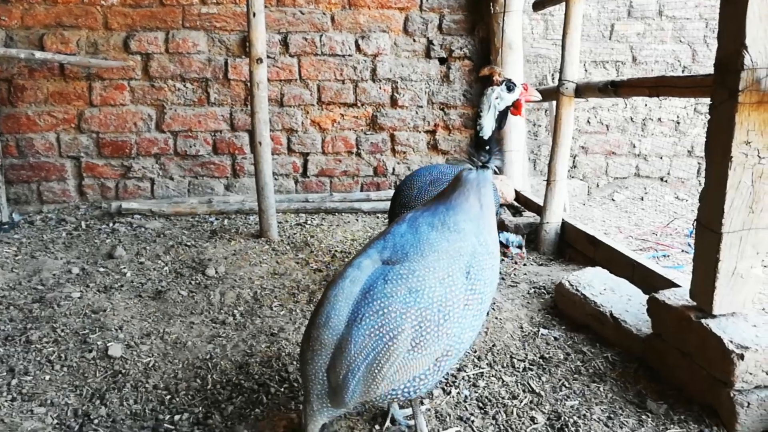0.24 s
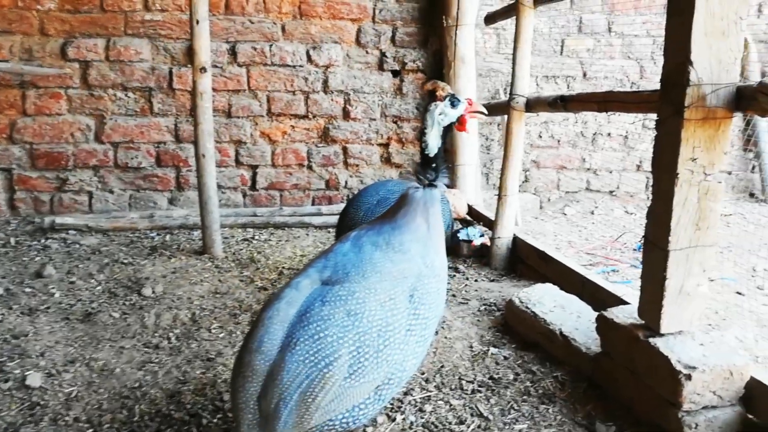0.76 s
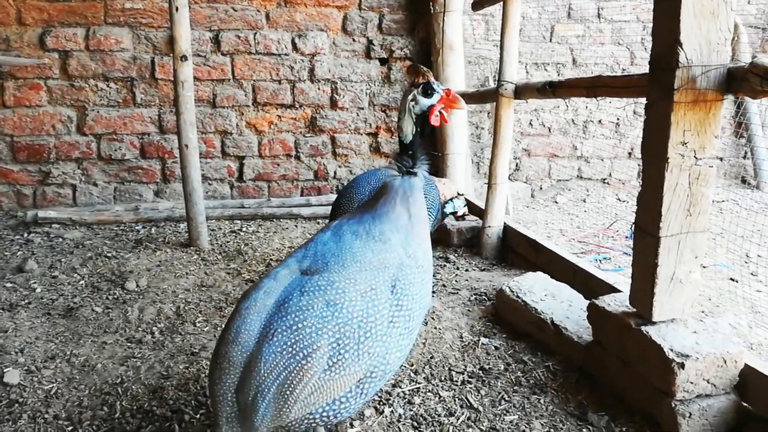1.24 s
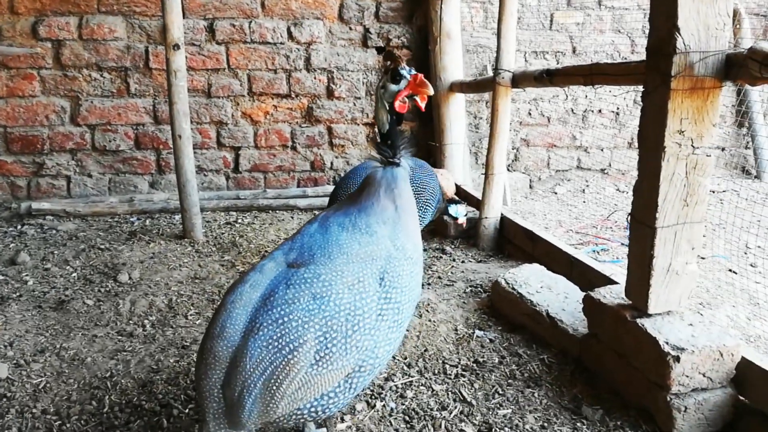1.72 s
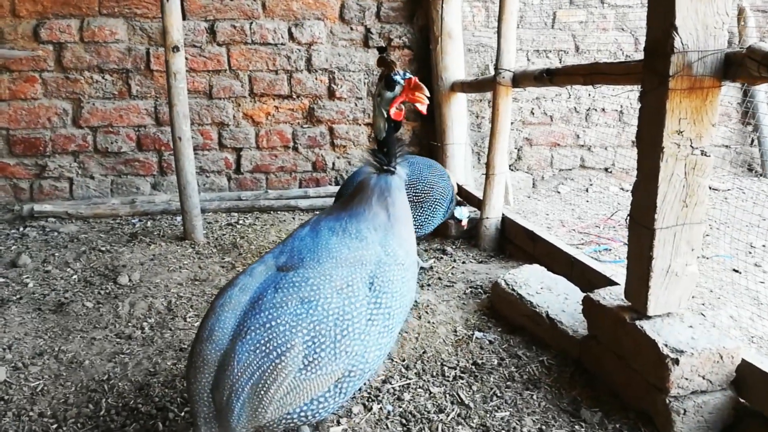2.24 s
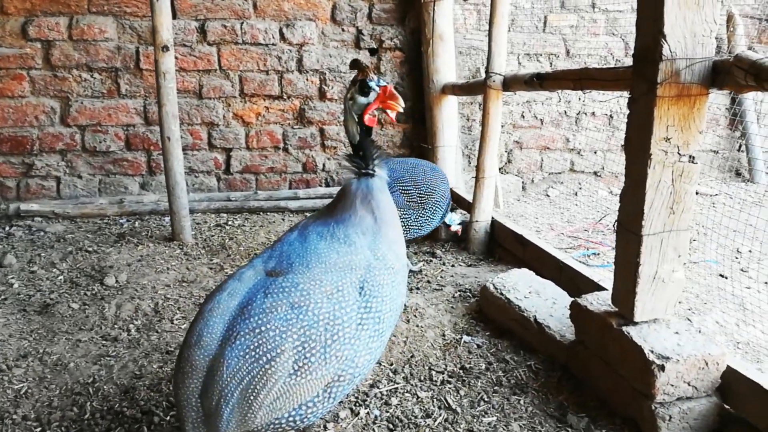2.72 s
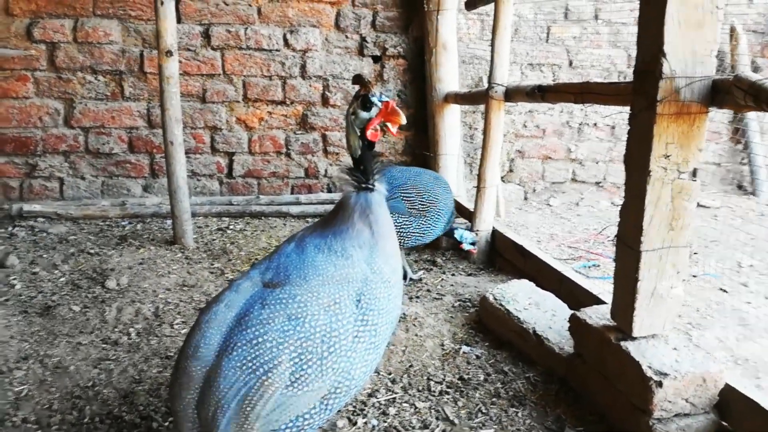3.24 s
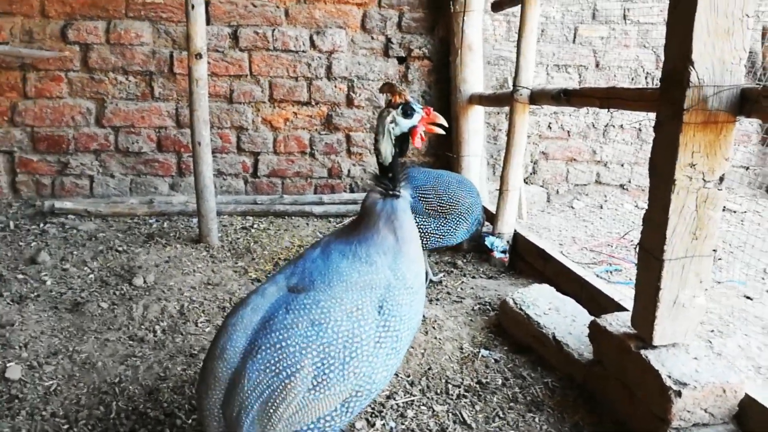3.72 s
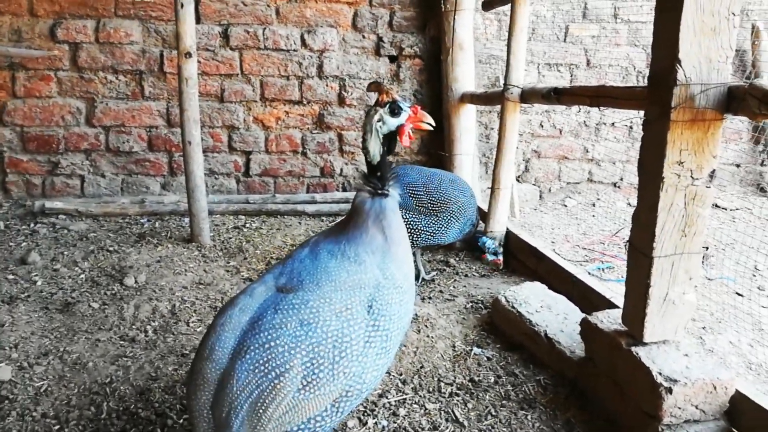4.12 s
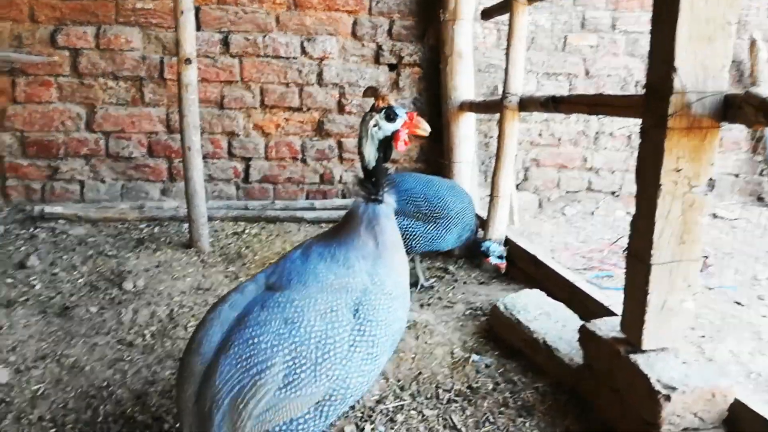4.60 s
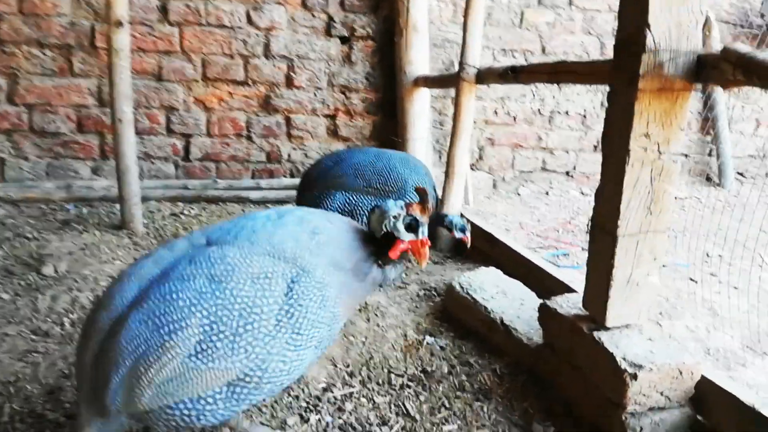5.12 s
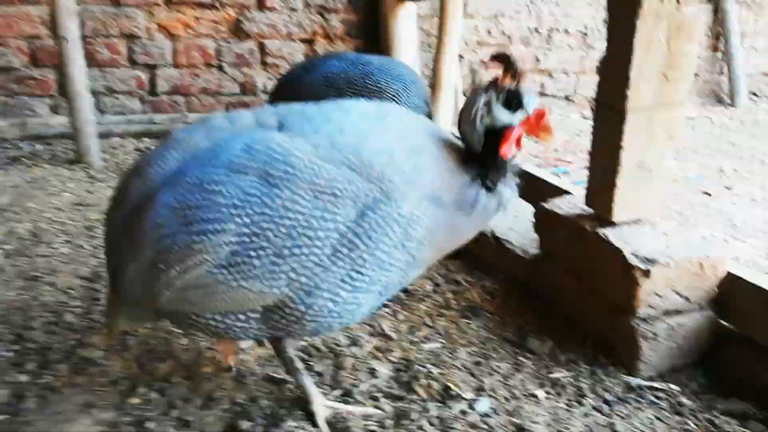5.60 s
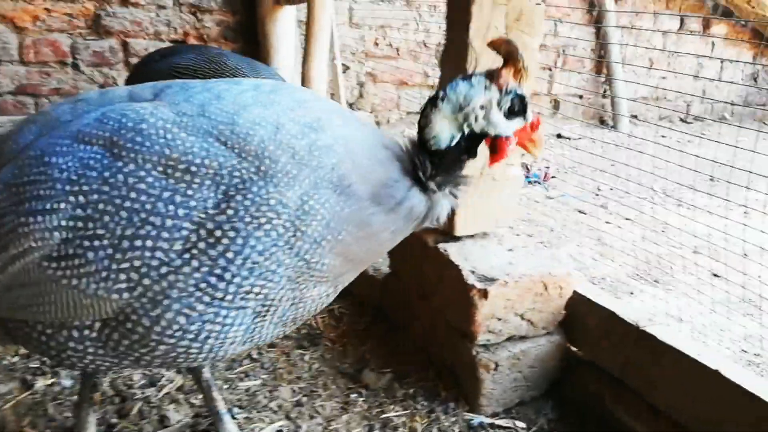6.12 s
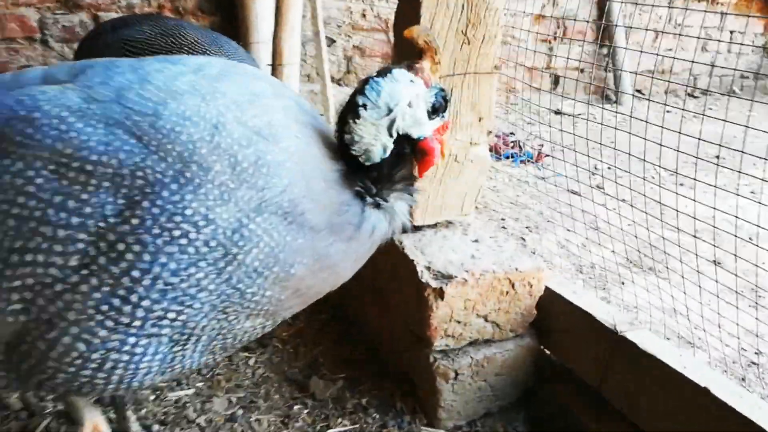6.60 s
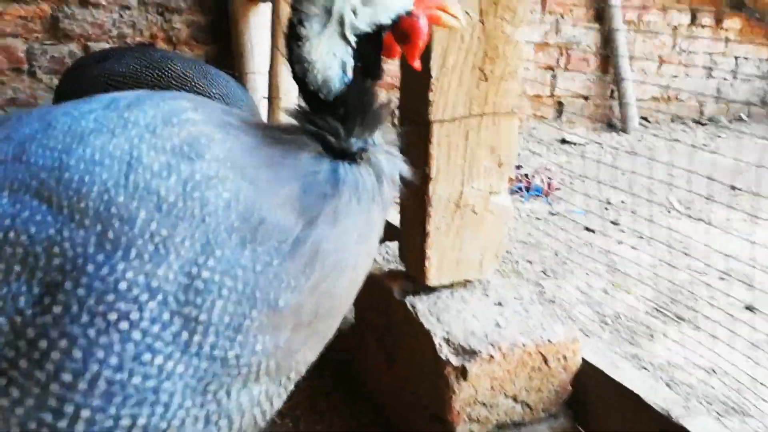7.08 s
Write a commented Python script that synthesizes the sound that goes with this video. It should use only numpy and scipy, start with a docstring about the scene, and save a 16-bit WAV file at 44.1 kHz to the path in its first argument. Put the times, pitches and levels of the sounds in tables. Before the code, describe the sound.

Very close to the microphone, a guinea fowl calls about four or five times a second in a small brick pen. Each call whistles high, swoops down and cracks into a harsh, brief tone, with clucks, hisses and thin wheezes between. After a short lull the calls become clipped and buzzy as the bird moves right, and a few light footsteps tap on dirt. Quiet air and low rumble lie beneath.

```python
"""A guinea fowl calls at close range in a brick pen, over quiet outdoor air and a low rumble.
At first each call is an arched whistle, a gliding near-sine, that swoops down and breaks into a harsh tone,
a fundamental with phase-modulated overtones. Clucks (pulses through resonances), hisses and thin wheezes
(gliding noise bands) come between. Late in the series the calls turn short and buzzy as the bird walks
past the microphone, and near the end a few steps, decaying noise bursts, tap on the dirt floor."""
import sys
import numpy as np
from scipy import signal
from scipy.fft import rfft, irfft, next_fast_len
from scipy.io import wavfile
from scipy.ndimage import uniform_filter1d, minimum_filter1d, map_coordinates

SR = 44100
rng = np.random.default_rng(int(sys.argv[2]) if len(sys.argv) > 2 else 0)


def to_wav(s):
    """Save 16-bit WAV."""
    ch = np.atleast_2d(s).T  # columns
    pcm = np.round(np.clip(ch, -1, 1) * 32767)  # PCM
    wavfile.write(sys.argv[1], SR, pcm.astype(np.int16))


N = 324135


def amp(db):
    """Decibel law: level to amplitude ratio."""
    return 10 ** (np.asarray(db) / 20)


def unit(x):
    """Normalisation: scale to rms 1."""
    return x / np.sqrt(np.mean(x ** 2) + 1e-20)


def along(points, hz):
    """Interpolation on a logarithmic frequency axis through (Hz, value) points."""
    f, v = np.transpose(points)
    return np.interp(np.log(hz + 1), np.log(f), v)


def curves(rows):
    """Linear interpolation in time: one value per sample for each column after the time."""
    s, *cols = np.transpose(rows)
    return [np.interp(np.arange(N) / SR, s, c) for c in cols]


def wobble(n, rate):
    """Band-limited randomness: n samples of a smooth random curve with rate knots a second."""
    knots = rng.standard_normal(int(n * rate / SR) + 4)
    return map_coordinates(knots, [np.arange(n) * rate / SR])


def filtered(x, response):
    """Linear filtering: multiply the spectrum of x by a response of frequency."""
    n = x.shape[-1]
    m = next_fast_len(n + 2048)
    return irfft(rfft(x, m) * response(np.fft.rfftfreq(m, 1 / SR)), m)[..., :n]


def turns(hz):
    """Phase as the running integral of frequency, in radians."""
    return 2 * np.pi * np.cumsum(hz) / SR


def add(track, s, sound):
    """Superposition: mix a sound into the track at time s."""
    part = track[max(round(s * SR), 0):][:len(sound)]
    part += sound[:len(part)]


def band(length, start_hz, end_hz, width_hz):
    """Turbulence in a bird's narrow throat: a gliding band of noise that swells and fades."""
    n = round(length * SR)
    # width_hz spans the half-amplitude points
    a, b = filtered(rng.standard_normal((2, n)), lambda f: 1 / (1 + (2 * f / width_hz) ** 2))
    phase = turns(np.linspace(start_hz, end_hz, n))
    noise = unit(a * np.cos(phase) + b * np.sin(phase))
    return noise * np.sin(np.linspace(0, np.pi, n))


# Level of the yard's low rumble. Each row: time in seconds, level in dB.
RUMBLE_LEVEL = [(0.2, -49), (1, -56.5), (2.4, -60.5), (4.1, -59), (5.4, -55), (6.7, -50.5)]
# Relative spectrum of the rumble. Each row: frequency in Hz, gain in dB.
RUMBLE_SPECTRUM = [(20, -2), (40, -4.5), (80, -5.5), (160, -9), (300, -13), (600, -18.5), (1500, -42)]
# Relative spectrum of the outdoor air. Each row: frequency in Hz, gain in dB.
AIR_SPECTRUM = [(100, -19), (400, -5), (1000, -6), (3500, 3), (6000, -6), (10000, -16), (16000, -15)]
AIR_DB = -49  # mean level of the air


def yard():
    """Partly coherent diffuse noise: outdoor air and an uneven low rumble, partly shared by both ports."""
    def noise(spectrum):
        separate = rng.standard_normal((2, N))
        shared = 0.46 * rng.standard_normal(N)
        return unit(filtered(separate + shared, lambda f: amp(along(spectrum, f))))

    rumble_db, = curves(RUMBLE_LEVEL)
    rumble = amp(rumble_db + 0.97 * wobble(N, 6.2)) * noise(RUMBLE_SPECTRUM)
    air = amp(AIR_DB + 2.4 * wobble(N, 1.3)) * noise(AIR_SPECTRUM)
    return rumble + air


# Reverberation time of the pen. Each row: frequency in Hz, 60 dB decay time in seconds.
PEN_T60 = [(300, 0.46), (1200, 0.23), (3500, 0.25), (6000, 0.24), (12000, 0.18)]
# Relative spectrum of the tail. Each row: frequency in Hz, gain in dB.
PEN_COLOUR = [(300, 6), (800, -6), (1500, -0.5), (3000, 6.5), (4500, 0.5), (8000, 1), (15000, 1)]


def pen(x, swell=0.0009):
    """Reverberation of walls and roof: convolution with decaying noise, drawn anew each third of a second."""
    out = np.zeros((2, N + SR))
    size = SR // 3
    for start in range(0, N, size):
        hz, t, z = signal.stft(rng.standard_normal((2, SR // 2)), SR, nperseg=256)
        decay_db = along(PEN_COLOUR, hz)[:, None] - 60 * t / along(PEN_T60, hz)[:, None]
        decay = amp(decay_db) * (1 - np.exp(-t / swell))
        tail = signal.istft(z * decay, SR, nperseg=256)[1]
        tail = tail / np.linalg.norm(tail[0])
        wet = signal.fftconvolve(x[None, start:start + size], tail, axes=1)
        out[:, start:start + wet.shape[1]] += wet
    return out[:, :N]


def nearby(x, echo_db=-17, count=4):
    """Early reflection off ground, post and bricks: a few copies per port, drawn anew each quarter second."""
    out = np.zeros((2, N + SR))
    size = SR // 4
    for start in range(0, N, size):
        for port in out:
            delays = rng.uniform(0.0009, .008, count)  # s
            strengths = rng.standard_normal(count)
            for delay, strength in zip(delays, strengths):
                gain = amp(echo_db) * strength / np.sqrt(count)
                add(port, start / SR + delay, gain * x[start:start + size])
    return out[:, :N]


# The bird stands ahead, then walks to the right.
# Each row: time in seconds, left minus right in dB, lead of the left port in samples.
PLACE = [(.3, -.6, .8), (1.4, -.4, -.8), (3.3, 0, -.8), (5.2, .2, .4), (5.9, -3.3, -1), (6.7, -6.5, -3),
         (7.1, -7, -4)]
# Level difference of the two ports. Each row: frequency in Hz, left minus right in dB.
PORT_BALANCE = [(400, .7), (2000, 2.5), (3000, -2), (3400, 0), (3900, 7.5), (5000, 2.5), (6200, -6.5),
                (8000, -1.5), (9100, -6), (12000, 0), (15000, -3)]
# Phase difference of the two ports. Each row: frequency in Hz, lead of the left in radians.
PORT_PHASE = [(400, 0), (3700, -.1), (4300, -2.1), (5500, -2.1), (7000, -1.2), (9000, -.4), (14000, .5)]


def microphones(x):
    """Stereo localisation by level and arrival time; each port also colours the treble in its own way."""
    pan_db, lead = curves(PLACE)

    def port(side):
        moved = map_coordinates(x, [np.arange(N) + side * lead / 2], order=5)
        return amp(side * pan_db / 2) * moved

    def colour(side, f):
        phase = side * along(PORT_PHASE, f) / 2
        return amp(side * along(PORT_BALANCE, f) / 2) * np.exp(1j * phase)

    return np.array([filtered(port(side), lambda f: colour(side, f)) for side in (1, -1)])


# Feet on dirt. Each row: start in seconds, initial claw tick level in dB,
# level in dB of the push that drives the thud (before its filter).
STEPS = [(6.85, -29.5, -26), (6.979, -23, -11), (7.166, -23, -20.5), (7.209, -45, -6)]


def steps(tick_t60=0.0024, thud_t60=0.018, thud_hz=300):
    """Impact excitation: a claw ticks on grit and the foot thuds on packed dirt, both as decaying noise."""
    out, t = np.zeros(N), np.arange(SR // 10) / SR
    for s, tick_db, thud_db in STEPS:
        grit = unit(filtered(rng.standard_normal(len(t)), lambda f: 1 / (1 + f / 6000)))
        tick = grit * amp(-60 * t / tick_t60)
        push = rng.standard_normal(len(t)) * amp(-60 * t / thud_t60)
        thud = filtered(push, lambda f: 1j * f * thud_hz / (thud_hz + 1j * f) ** 2)
        add(out, s, amp(tick_db) * tick + amp(thud_db) * thud)
    return out


# Thin falling wheezes. Each row: start in seconds, starting centre in Hz, level in dB before the swell.
WHEEZES = [(0.12, 5600, -38.5), (0.545, 3310, -46), (0.769, 4600, -40), (1.06, 3200, -40),
           (1.134, 3280, -37), (1.78, 5210, -35), (2.462, 3800, -37.5), (3.125, 3430, -43.5),
           (3.969, 3190, -40), (4.2, 5390, -33.5), (5.049, 2840, -52.5), (6.131, 5230, -29),
           (6.321, 3100, -47), (6.57, 3460, -35.5)]
WHEEZE_S, WHEEZE_FALL, WHEEZE_WIDTH_HZ = .105, .25, 490  # length; share by which the centre sinks; width


def wheezes():
    """Turbulence noise in a narrow band whose centre falls."""
    out = np.zeros(N)
    for s, hz, db in WHEEZES:
        add(out, s, amp(db) * band(WHEEZE_S, hz, hz * (1 - WHEEZE_FALL), WHEEZE_WIDTH_HZ))
    return out


# Broad hisses. Each row: start in seconds, length in seconds, starting centre in Hz,
# level in dB before the swell.
HISSES = [(0.695, .13, 4380, -36), (1.031, 0.079, 4370, -33), (1.229, 0.094, 5310, -18),
          (1.578, 0.18, 5150, -26.5), (2.049, 0.079, 5320, -26), (2.603, 0.075, 5900, -37.5),
          (2.846, 0.09, 5800, -38.5), (4.37, .11, 5530, -22), (5.583, .11, 5400, -25),
          (5.622, 0.063, 3690, -33.5), (6.463, 0.12, 5600, -38.5)]
HISS_RISE, HISS_WIDTH_HZ = 0.073, 1300  # share by which the centre climbs; width


def hisses():
    """Turbulence noise in a broad band whose centre rises a little."""
    out = np.zeros(N)
    for s, length, hz, db in HISSES:
        add(out, s, amp(db) * band(length, hz, hz * (1 + HISS_RISE), HISS_WIDTH_HZ))
    return out


# Resonances of the neck and closed beak in a cluck.
# Each row: centre in Hz, width in Hz, relative gain in dB.
GULLET = [(411, 141, 1.5), (1164, 186, -5.5), (1846, 335, 7), (2220, 570, -5), (3860, 530, -28),
          (7160, 1080, -3), (9300, 1780, -2), (16200, 1200, -16)]


def neck(hz):
    """Resonance: complex response of the neck's modes, summed with alternating signs."""
    total = 0
    for k, (centre, width, db) in enumerate(GULLET):
        mode = 1j * hz * width / (centre ** 2 - hz ** 2 + 1j * hz * width)
        total = total + (-1) ** k * amp(db) * mode
    return total


# Clucks. Each row: start in seconds, length in seconds, level in dB just after the opening burst.
CLUCKS = [(0.674, 0.035, -23), (0.874, .031, -25), (1.065, 0.02, -30), (1.258, 0.035, -26),
          (1.454, 0.037, -28), (1.637, 0.03, -29.5), (1.999, 0.056, -25), (2.266, 0.06, -23.5),
          (2.579, 0.07, -27), (3.092, 0.071, -24), (3.401, 0.091, -24.5), (3.689, 0.082, -26.5),
          (4.314, 0.084, -21.5), (4.604, .073, -19), (4.884, .06, -20), (5.143, 0.033, -23),
          (5.364, 0.031, -23.5), (5.585, 0.046, -25.5), (5.824, .044, -25), (6.059, 0.028, -26.5),
          (6.282, 0.017, -29.5)]
CLUCK_HZ = 779  # nominal pulse rate at the start of every cluck
KNEE_HZ_PER_S = 1400  # longer clucks are held at a higher pitch


def clucks(short_knee_hz=500, end_hz=260, burst_db=6, fade_db=5, drift=0.06, breath_db=-15,
           burst=0.016, soft_hz=4200):
    """Source and filter: a burst of uneven pulses rings the neck, then slows and weakens into a falling note."""
    out = np.zeros(N)
    for s, length, db in CLUCKS:
        t = np.arange(0, length + 0.0071, 1 / SR)
        n = len(t)
        knee_hz = short_knee_hz + KNEE_HZ_PER_S * length
        pitch = np.interp(t, [0, .009, max(.011, length - .042), length, length + .014],
                          [CLUCK_HZ, knee_hz, .95 * knee_hz, end_hz, .9 * end_hz])
        unsteady = np.interp(length, [.03, .06], [.2, .03])  # short clucks never settle on a pitch
        phase = turns(pitch * np.exp(unsteady * wobble(n, 600) + drift * wobble(n, 110)))
        clicks = np.diff(np.floor(phase / (2 * np.pi)), prepend=-1)  # one per cycle
        pulses = unit(clicks * amp(1.53 * rng.standard_normal(n)))
        # soft closures: the treble is mostly air
        pulses = filtered(pulses, lambda f: 1 / (1 + 1j * f / soft_hz) ** 2)
        # air escapes once a cycle
        air = unit(rng.standard_normal(n) * (0.73 + np.cos(phase)) * amp(2.4 * wobble(n, 220)))
        air = unit(np.diff(air, prepend=0))  # turbulence is brighter than the pulses
        voice = unit(filtered(pulses + amp(breath_db) * air, neck))
        level = np.interp(t, [0, burst / 2, burst, max(.016, 0.76 * length), length + 0.013],
                          [0, burst_db, 0, -fade_db, -32])
        add(out, s + 0.002, voice * amp(db + level))
    return out


# The two manners of calling. Columns: length of the whistle's swoop in seconds, its climb as a multiple
# of the swoop, break frequency in Hz under a 5 kHz crest, level early in the swoop against mid-swoop in dB,
# buzz of a smooth tone from 0 to 1.
DRAWN = (.028, .7, 3420, -14, .08)
CLIPPED = (0.0076, 1.5, 3302, -2, 0.64)
CLIPPED_FROM_S = 4.8  # the bird sets off walking and its drawn-out calls turn clipped


def manner(s):
    """Change of regime: the manner in which the bird calls at time s."""
    return CLIPPED if s > CLIPPED_FROM_S else DRAWN


HUM_ROUGH, HUM_DELAY_S, HUM_S, HUM_DB = .45, 0.021, 0.079, -49  # calls rougher than this leave a low hum


def hums(hz=355):
    """Low-frequency oscillation: a faint wavering note swells and fades just after each rough call's break."""
    out, n = np.zeros(N), round(HUM_S * SR)
    for s, _, _, _, rough, _, _ in SQUAWKS:
        if rough > HUM_ROUGH:
            note = unit(np.sin(turns(hz * (1 + 0.036 * wobble(n, 57)))))
            add(out, s + HUM_DELAY_S, amp(HUM_DB) * note * np.sin(np.linspace(0, np.pi, n)))
    return out


LEAD_S, LEAD_DB, LEAD_WIDTH_HZ = .055, -31.5, 720  # length; level before the swell; width


def leads():
    """Turbulence noise near the crest pitch: a wheeze in the moment before each drawn-out call's break."""
    out = np.zeros(N)
    for s, *_, crest_hz, _ in SQUAWKS:
        if manner(s) is DRAWN:
            add(out, s - LEAD_S, amp(LEAD_DB) * band(LEAD_S, crest_hz, crest_hz, LEAD_WIDTH_HZ))
    return out


# Calls, shared by whistles, tones, leads and hums. Each row: break from whistle to tone in seconds,
# tone length in seconds, starting pitch in Hz, tone level in dB, roughness from 0 to 1,
# whistle crest in Hz, whistle level at mid-swoop in dB.
SQUAWKS = [(0.264, 0.041, 1504, -8.5, 0.08, 3555, -20.5), (0.683, 0.024, 1489, -9, 0.15, 4250, -18),
           (0.98, 0.025, 1517, -3.5, 0.08, 3960, -14), (1.319, 0.024, 1530, -6, 0.15, 4710, -5.5),
           (1.521, 0.015, 1450, -6.5, 0.17, 4950, -14), (1.722, 0.024, 1548, -3, 0.14, 4900, -12),
           (1.931, 0.048, 1624, -7.5, 0.26, 5260, -11), (2.158, .049, 1623, -3.5, 0.09, 5200, -6.5),
           (2.363, 0.045, 1619, -4.5, 0.11, 5060, -6), (2.569, 0.046, 1629, -5.5, 0.28, 5150, -7.5),
           (2.758, 0.035, 1589, -6.5, .42, 4930, -9), (2.979, 0.033, 1491, -3, 0.14, 4870, -9),
           (3.226, 0.037, 1518, -5, 0.06, 4910, -8.5), (3.441, 0.046, 1526, -3.5, 0.44, 4900, -5),
           (3.648, 0.046, 1638, -5.5, 0.64, 5000, -2.5), (3.88, 0.043, 1626, -9, 0.61, 5020, -9.5),
           (4.091, 0.05, 1595, -5.5, .54, 5030, -10.5), (4.509, 0.0073, 1415, -25.5, 0, 3514, -30),
           (4.729, 0.016, 1457, -13.5, 0.1, 3840, -18), (4.963, 0.02, 1787, -11, 0.2, 4140, -9),
           (5.226, .013, 1690, -10, 0.43, 3940, -16), (5.455, 0.012, 1850, -8, 0.42, 3800, -31),
           (5.49, 0.0062, 1894, -19.5, 0.2, 4210, -16.5), (5.704, 0.015, 1760, -8, 0.36, 4480, -12),
           (5.957, 0.017, 1837, -7.5, 0.36, 3920, -7.5), (6.221, 0.019, 1880, -5, 0.21, 3970, -6),
           (6.53, .008, 1740, -24.5, 0.36, 4400, -9.5), (6.719, 0.009, 1800, -8, 0, 2490, -31),
           (6.755, 0.0037, 1700, -45, .2, 4140, -16), (7.077, .017, 1775, -9, 0.27, 3730, -7.5)]
# Relative spectrum of the overtones and throat noise. Each row: frequency in Hz, gain in dB.
THROAT = [(2500, -8), (3200, -2.5), (4000, 3), (4800, 3), (5600, -6.5), (6500, -10.5), (8000, -20),
          (10000, -28.5), (13000, -21.5), (16000, -34)]
# An open beak radiates bass poorly. Each row: frequency in Hz, gain in dB.
BEAK = [(20, -12), (500, -10.5), (850, -1.5), (1200, -2.5), (1600, -2.5), (16000, -2.5)]
DROOP, DROOP_PER_S = 0.057, 1.77  # share of its pitch that a tone loses: longer tones sink further
BUZZ_PER_ROUGH = 1  # rough tones also flutter more
# overtones over the fundamental at full scale, before the fade within a tone; softer calls are duller
FULL_BRIGHT_DB, BRIGHT_DB_PER_DB = 9.5, .5
DULL_DB_PER_OCT = .5  # the overtones slope down this much more for each dB of lost level


def tones(attack=0.00256, release=0.0083, hold=0.53, fade_db=11, buzz_depth=0.73, rough_depth=0.85,
          rasp_db=-15, under_db=-8):
    """Subharmonic modulation: the syrinx beats about an octave lower; slower flutter splits lines into a rasp."""
    out = np.zeros(N)
    for s, length, hz, db, rough, _, _ in SQUAWKS:
        droop = DROOP + DROOP_PER_S * length
        bright_db = FULL_BRIGHT_DB + BRIGHT_DB_PER_DB * db
        buzz = min(1, manner(s)[-1] + BUZZ_PER_ROUGH * rough)
        t = np.arange(-attack, length + release, 1 / SR)
        n, u = len(t), np.clip(t / length, 0, 1.2)
        pitch = hz * (1 - droop * u ** 1.7) * (1 + .006 * wobble(n, 200))
        phase = turns(pitch)
        # clipped calls lock the flutter to every third cycle, drawn-out ones flutter more slowly
        locked = manner(s) is CLIPPED
        flutter = phase / 3 if locked else phase * 0.28 + 1.38 * wobble(n, 203)
        shake = buzz * buzz_depth * np.sin(flutter) + rough * rough_depth * wobble(n, 904.7)

        k = np.arange(2, 11)[:, None]  # overtone numbers
        slope_db = DULL_DB_PER_OCT * db * np.log2(k)
        uneven_db = 2.3 * np.array([wobble(n, 140) for _ in k])
        sizes = amp(along(THROAT, k * pitch) + slope_db + uneven_db)
        offsets = rng.uniform(0, 2 * np.pi, k.shape)
        overtones = sizes * np.sin(k * phase + np.sqrt(2 * k) * shake + offsets)
        dulling_db = 3 - 11 * u ** 3  # overtones fade first as the pressure falls
        voice = unit(np.sin(phase + shake)) + amp(bright_db + dulling_db) * unit(overtones.sum(0))

        voice = voice * (1 + 0.75 * buzz * np.cos(flutter) + 1.04 * rough * wobble(n, 502))
        voice = voice * (1 + 0.17 * u ** 2 * np.cos(phase / 2))  # cycles alternate in size as the call gives out
        undertone = unit(np.cos(2 * flutter))  # sounds only when the flutter is locked
        voice = unit(voice + locked * buzz * amp(under_db) * undertone)
        rasp = unit(filtered(rng.standard_normal(n), lambda f: amp(along(THROAT, f))))
        voice = filtered(voice + rough * amp(rasp_db) * rasp, lambda f: amp(along(BEAK, f)))
        level = np.interp(t, [-attack, 0, hold * length, length, length + release],
                          [-24, 0, -1.5, -fade_db, -38])
        level = level + 1.4 * wobble(n, 246)
        add(out, s, unit(voice) * amp(db + level))
    return out


BREAK_FOLLOWS_CREST = 0.488  # a lower crest breaks lower, by this power
OVERLAP_S = 0.003  # the whistle runs on into the tone


def whistles(waver=0.0273, waver_hz=450, air_db=-25):
    """Frequency glide: a nearly pure tone climbs softly to its crest, swells as it swoops, stops at the break."""
    out = np.zeros(N)
    for s, *_, crest_hz, swoop_db in SQUAWKS:
        fall, rise, high_break_hz, crest_under_db, _ = manner(s)
        break_hz = high_break_hz * (crest_hz / 5000) ** BREAK_FOLLOWS_CREST
        crest_db = swoop_db + crest_under_db
        u = np.arange(-rise * fall, 1.2 * fall, 1 / SR) / fall  # 0 on the crest, 1 at the break
        n = len(u)
        arch = crest_hz + (break_hz - crest_hz) * np.minimum(u, 1) ** 2
        pitch = arch * (1 + waver * wobble(n, waver_hz))
        level = np.interp(u, [-rise, -.6 * rise, 0, .3, .55, .9, 1.15],
                          [-54, crest_db - 8, crest_db - 5, crest_db, swoop_db, swoop_db + 4, swoop_db - 20])
        phase = turns(pitch) + 0.38 * wobble(n, 1740)
        tone = np.sin(phase) + amp(-39) * np.sin(2 * phase)
        air = unit(filtered(rng.standard_normal(n), lambda f: amp(along(THROAT, f) + along(BEAK, f))))
        sound = (unit(tone) + amp(air_db) * air) * amp(level + 3.2 * wobble(n, 405))
        add(out, s + OVERLAP_S - (1 + rise) * fall, sound)
    return out


def scene():
    """Superposition of the bird's direct sound, its echoes in the pen, and the yard."""
    bird = whistles() + tones() + clucks() + hisses() + wheezes() + leads() + hums() + steps()
    return microphones(bird) + nearby(bird) + amp(-19.5) * pen(bird) + yard()


TOP_HZ = 16000  # band limit


def record(dry, ceiling=1.0):
    """Peak limiting and band limiting: fast gain reduction at full scale, then a cut above the band limit."""
    needed = np.minimum(1, ceiling / (np.abs(dry).max(0) + 1e-9))
    gain = uniform_filter1d(minimum_filter1d(needed, size=89), size=45)
    return filtered(dry * gain, lambda hz: hz < TOP_HZ)


dry = scene()
out = record(dry)
to_wav(out)
```